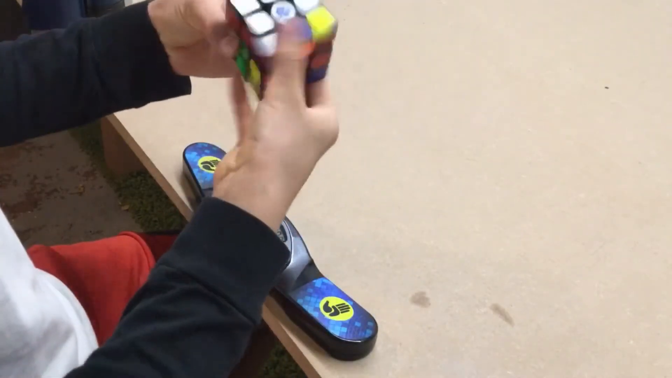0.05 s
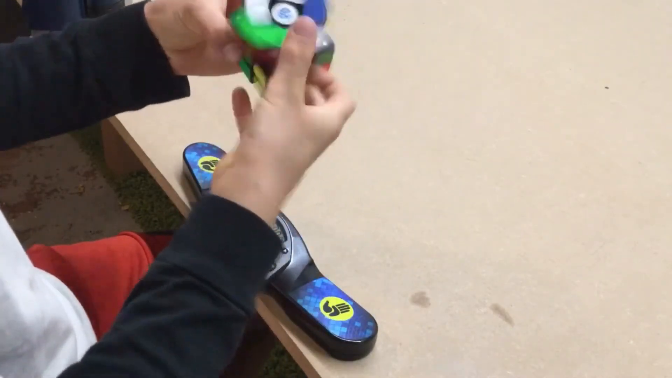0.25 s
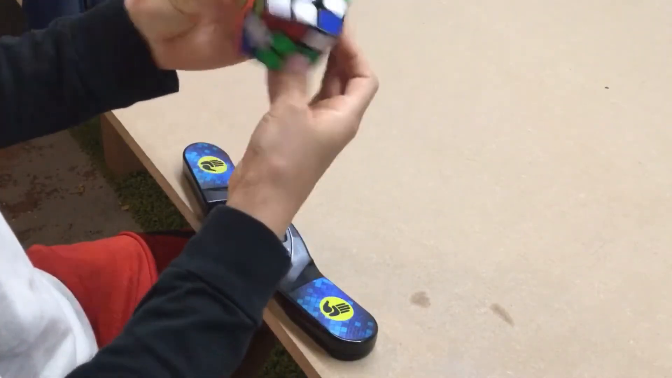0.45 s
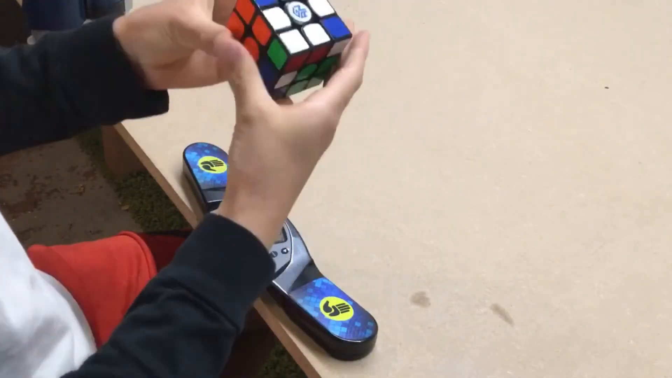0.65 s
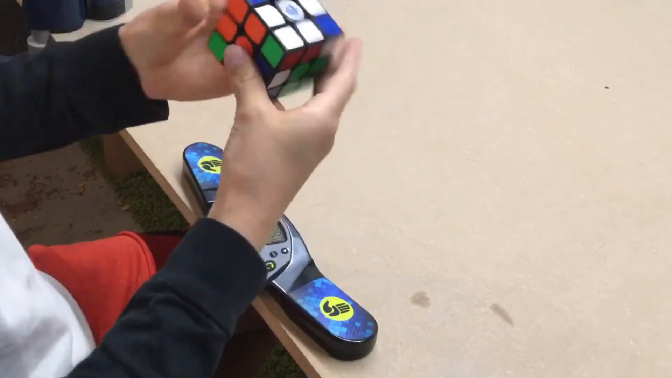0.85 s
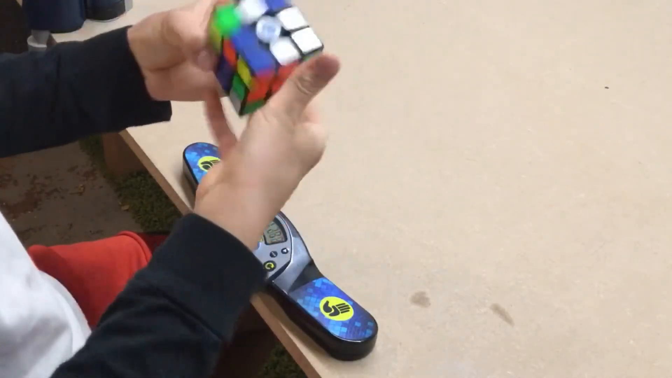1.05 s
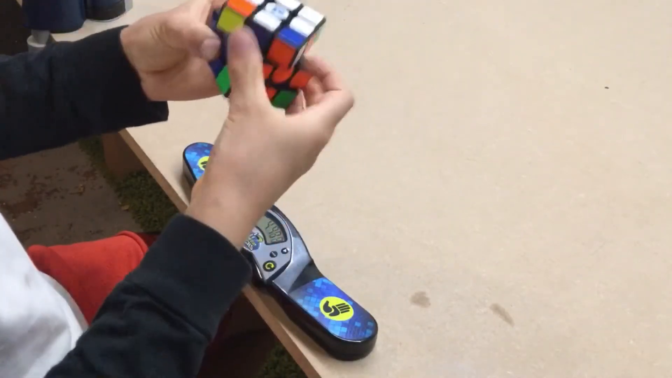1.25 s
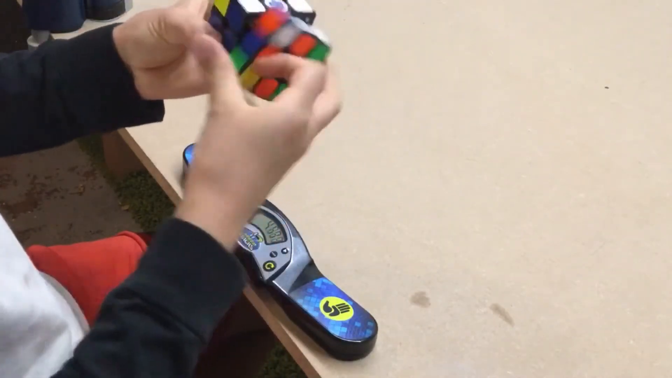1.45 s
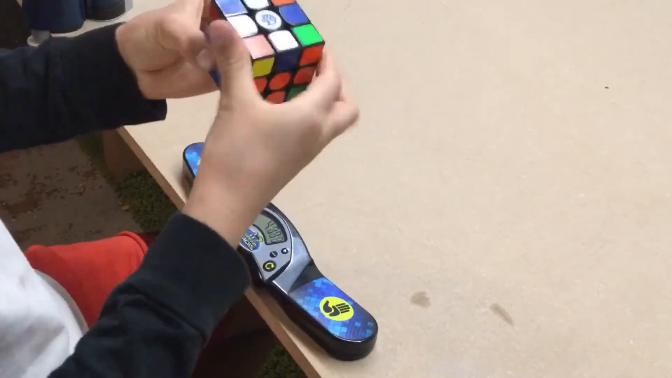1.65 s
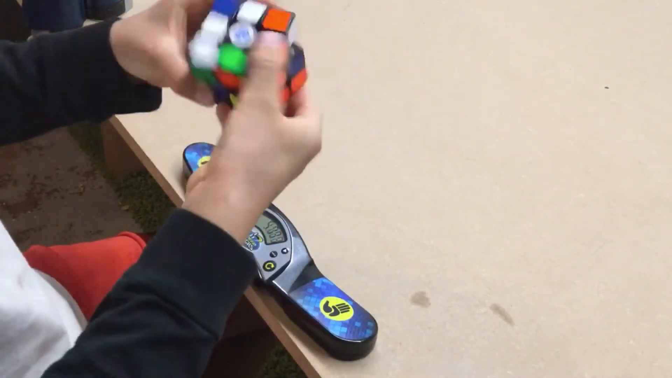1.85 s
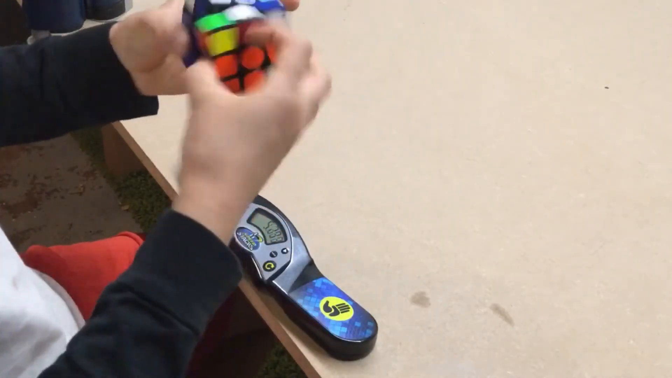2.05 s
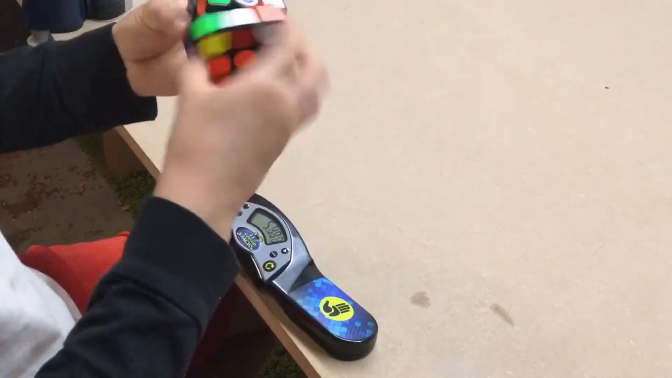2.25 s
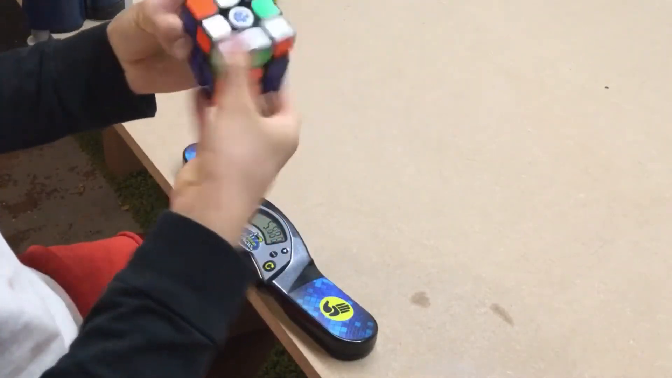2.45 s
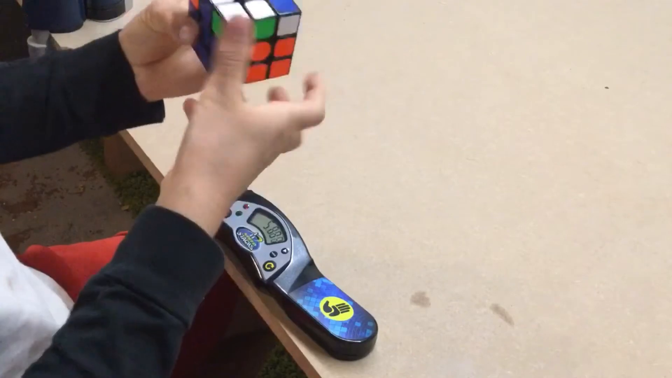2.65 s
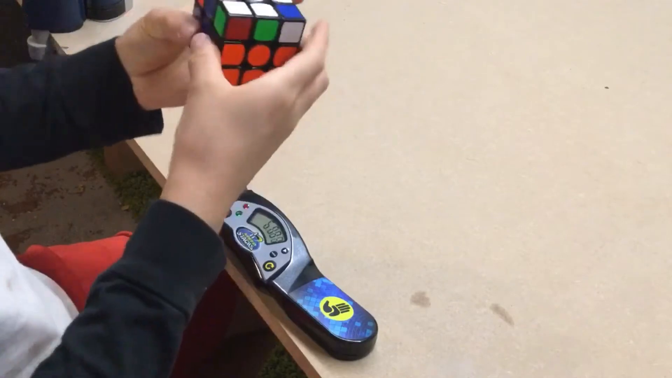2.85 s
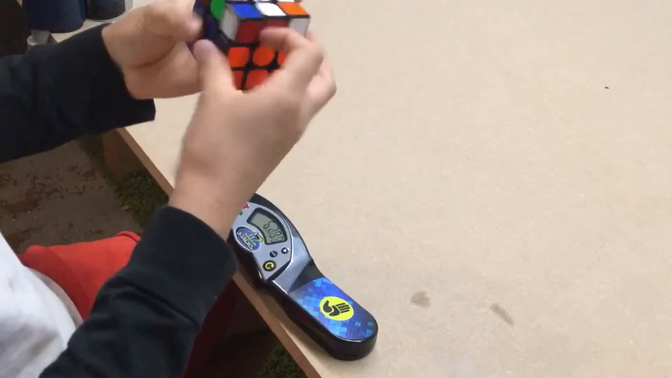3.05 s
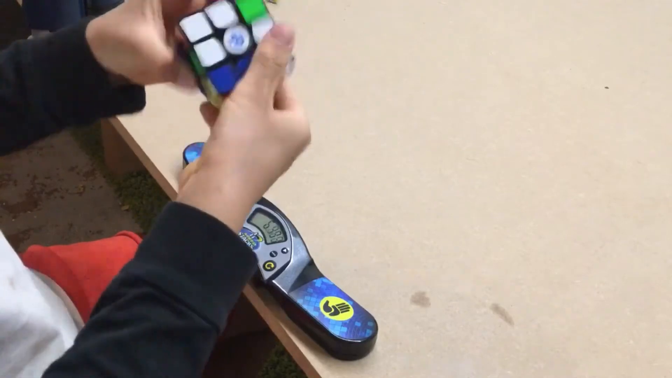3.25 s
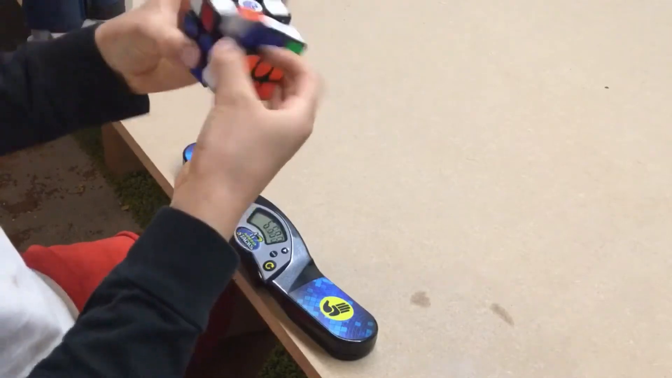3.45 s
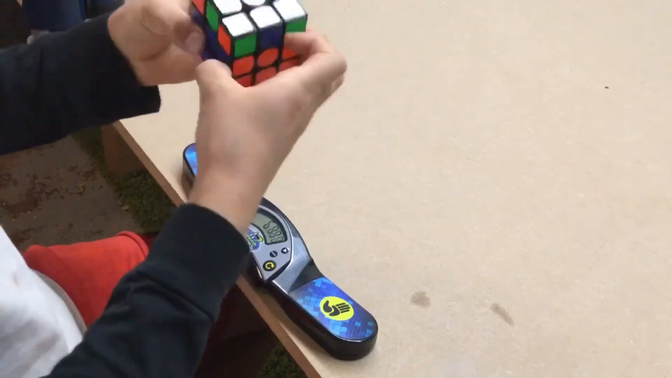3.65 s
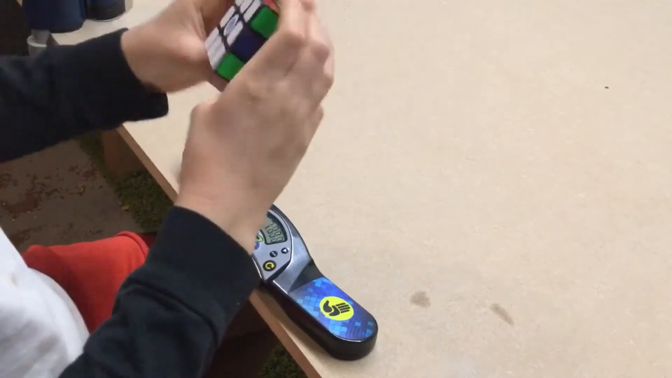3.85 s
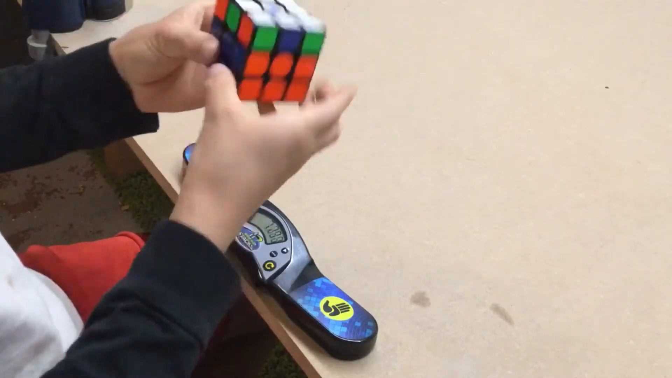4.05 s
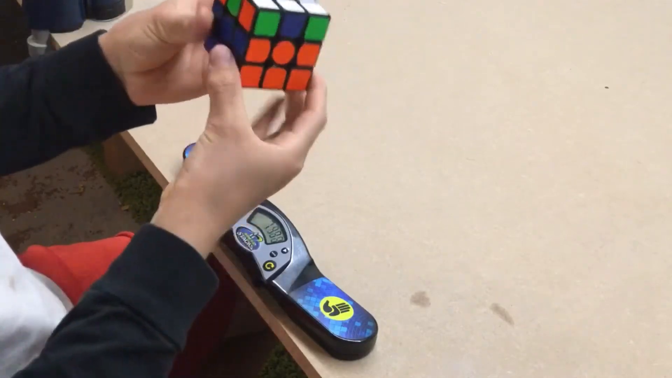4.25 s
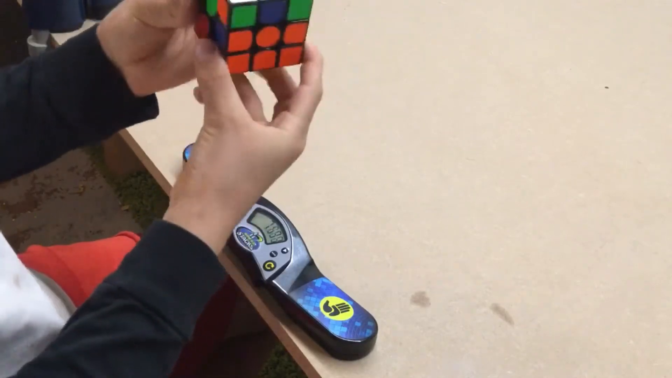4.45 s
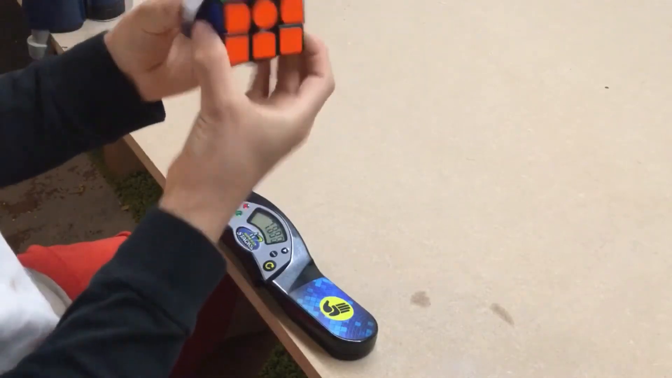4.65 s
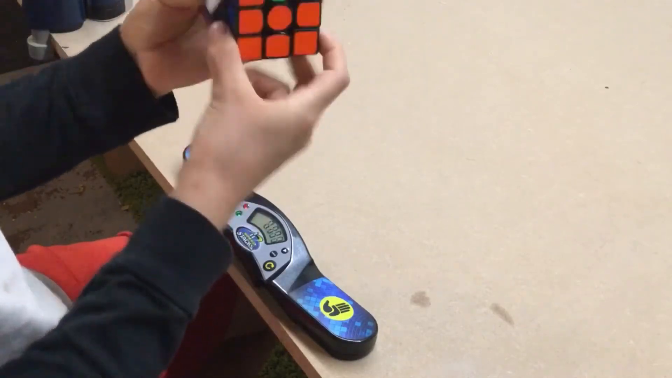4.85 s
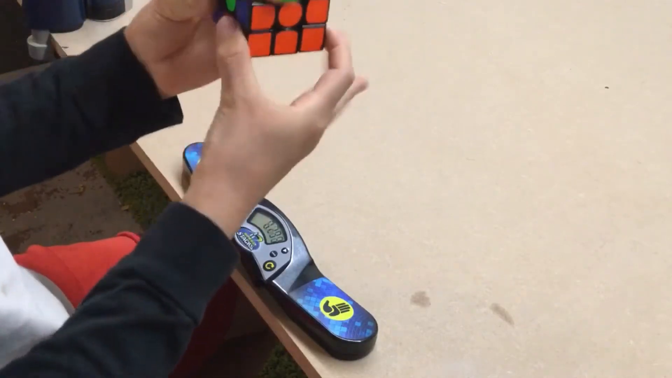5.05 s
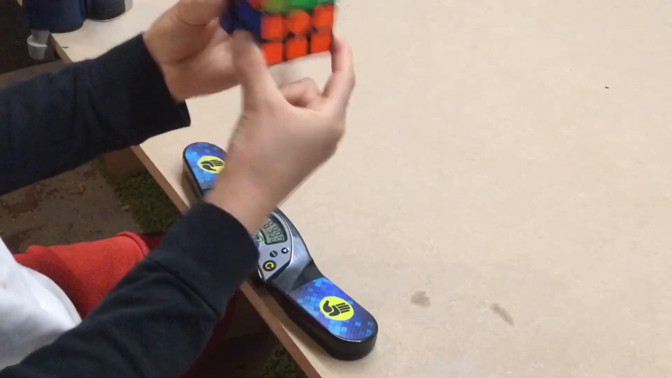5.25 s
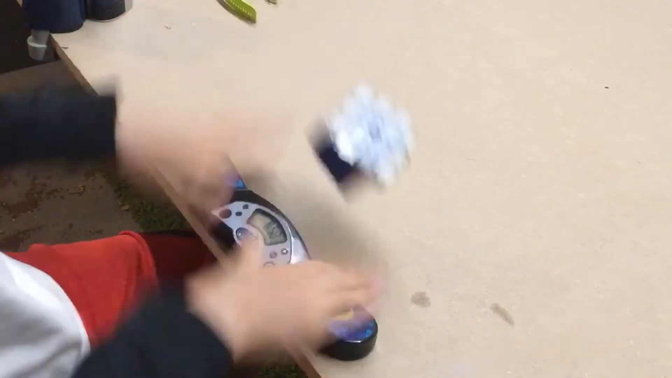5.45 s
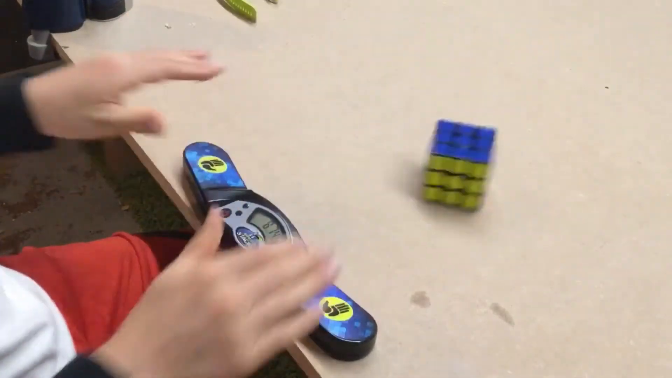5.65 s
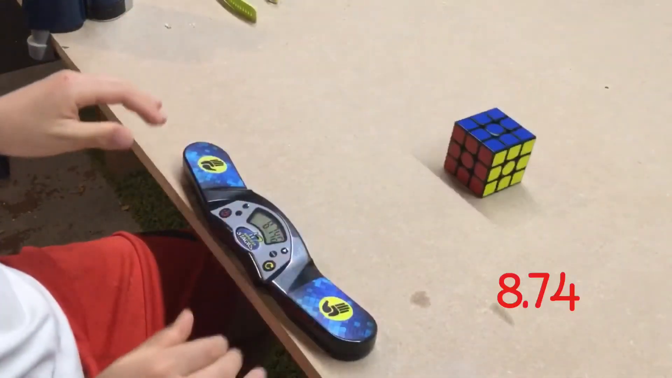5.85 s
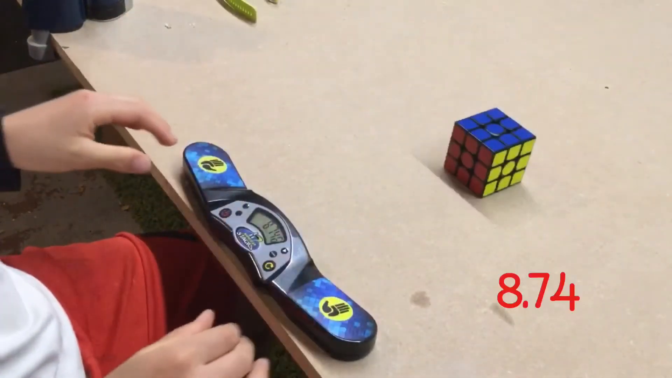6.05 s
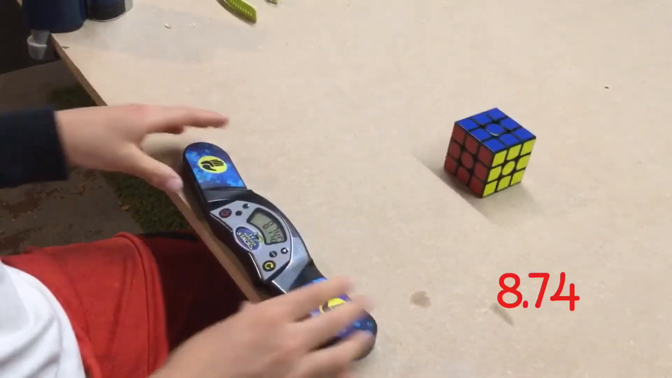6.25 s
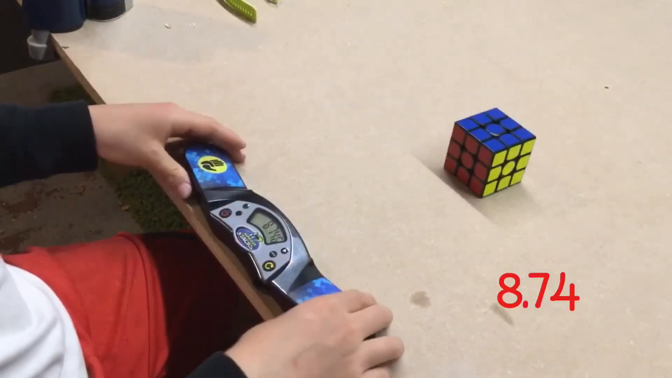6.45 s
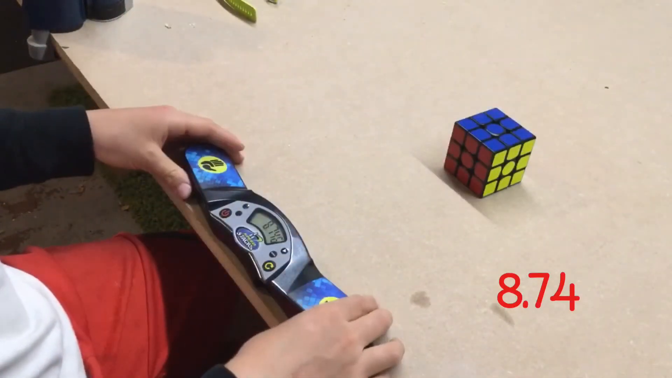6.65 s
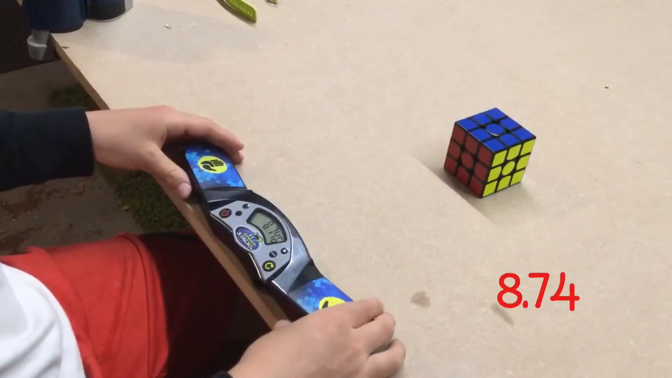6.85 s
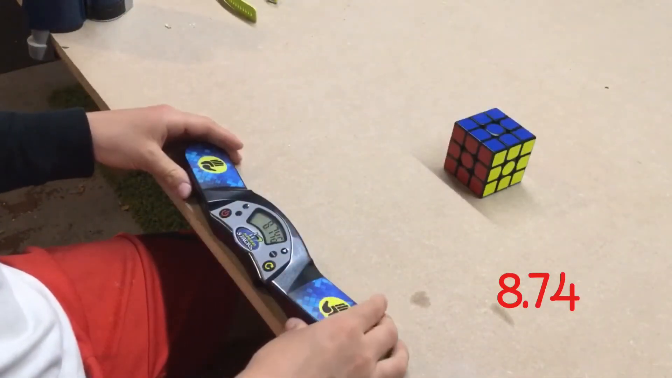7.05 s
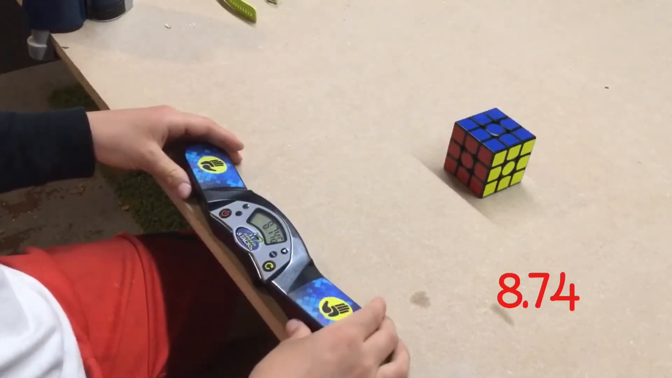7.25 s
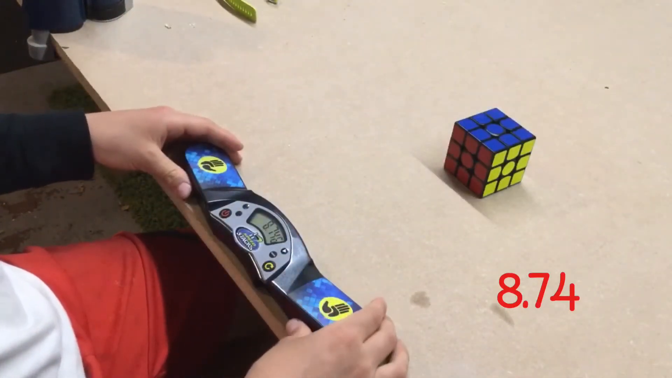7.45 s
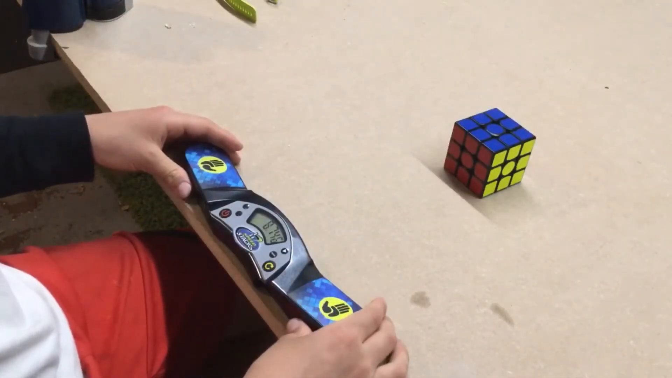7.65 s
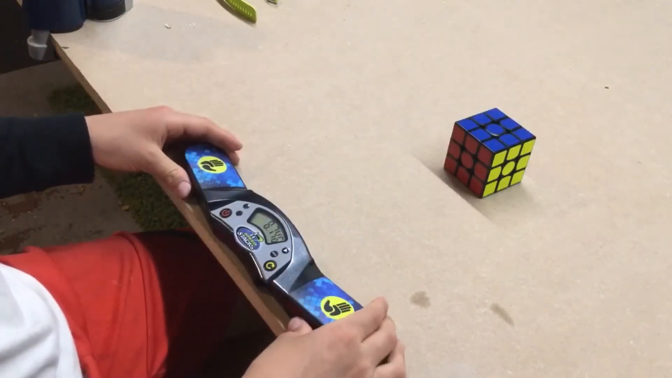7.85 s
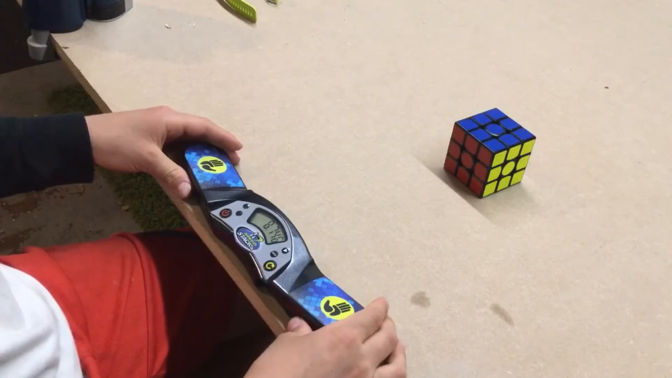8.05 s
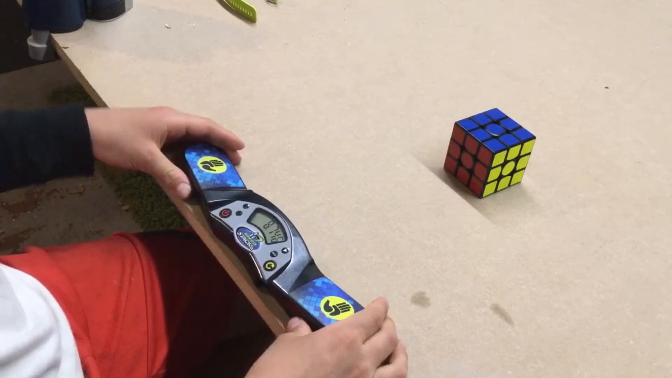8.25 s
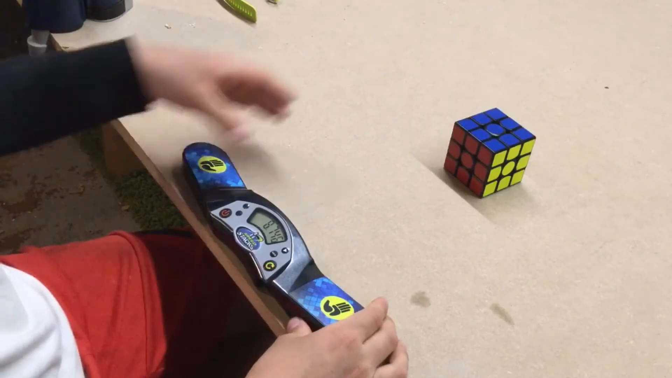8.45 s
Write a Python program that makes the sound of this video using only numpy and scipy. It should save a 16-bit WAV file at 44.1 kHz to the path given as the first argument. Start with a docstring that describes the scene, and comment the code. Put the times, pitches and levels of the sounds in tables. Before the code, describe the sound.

Rapid plastic clacking of a twisted puzzle cube ends in a clattering thump on a table, followed by a light knock over low room hum.

```python
"""In a small room with a low steady hum, hands turn a plastic puzzle cube fast, close to a phone.
Its pieces clack as they snap together and rattle as they slide; a few faint, thin ticks sound nearby.
The cube is dropped on a table, hands slap a timer pad, and the cube tumbles to rest as the top rings.
Later the pad tips and its hollow shell knocks. The room echoes, and the phone mutes faint treble."""
import sys
import numpy as np
from scipy import signal
from scipy.fft import rfft, irfft, next_fast_len
from scipy.io import wavfile
from scipy.ndimage import uniform_filter1d, map_coordinates

SR = 44100
rng = np.random.default_rng(int(sys.argv[2]) if len(sys.argv) > 2 else 0)


def log_audio(samples):
    """Write samples as a 16-bit WAV file to the path given in sys.argv[1]."""
    # one column per channel
    frames = np.atleast_2d(samples).T
    # limit to full scale, then quantise
    limited = np.clip(frames, -1, 1)
    pcm = np.round(limited * 32767).astype(np.int16)
    wavfile.write(sys.argv[1], SR, pcm)


N = 375291

# turns of one layer of the cube: full_speed_at_s, level_db, hold_ms
TURNS = [(0.0, -60, 120), (0.125, -47, 10.7), (0.245, -47.5, 8.9), (0.47, -69, 14), (0.901, -74, 20),
         (1.0, -77, 20), (1.06, -51.5, 21), (1.14, -46, 9.9), (1.315, -53.5, 51), (1.548, -59, 3.6),
         (1.665, -66, 19), (1.745, -57.5, 53), (1.86, -60.5, 41), (1.98, -54.5, 16), (2.1, -61.5, 58),
         (2.179, -57, 44), (2.345, -55, 48), (2.465, -46.5, 34), (2.981, -62, 16), (3.14, -64.5, 60),
         (3.25, -64, 33), (3.345, -44, 41), (3.496, -40.5, 23), (4.24, -70.5, 20), (4.302, -53.5, 43),
         (4.39, -51.5, 11), (4.584, -41.5, 8.4), (4.67, -58, 21), (4.781, -37.5, 29), (4.97, -59.5, 63),
         (5.138, -44.5, 10.6), (5.244, -49, 7.1), (5.335, -62, 110)]


def amp(db):
    """Turn decibels into a number to multiply a sound by."""
    return 10 ** (np.asarray(db) / 20)


def unit(x):
    """Scale a signal so that its average strength (rms) is 1."""
    return x / np.sqrt(np.mean(x ** 2) + 1e-20)


def along(points, hz):
    """Read a curve of (pitch, value) points at hz, with octaves evenly spaced."""
    pitches, values = np.transpose(points)
    return np.interp(np.log(hz + 1), np.log(pitches + 1), values)


def filtered(x, response):
    """Turn each frequency of x up or down by response(hz)."""
    size = next_fast_len(N + SR // 2)
    return irfft(rfft(x, size) * response(np.fft.rfftfreq(size, 1 / SR)), size)[:N]


def motor(shaft_hz=29.07, unsteadiness=.015):
    """A distant machine drones at multiples of its slightly unsteady turning speed."""
    waver = map_coordinates(rng.standard_normal(round(3 * N / SR) + 4), [np.arange(N) * 3 / SR])
    angle = 2 * np.pi * np.cumsum(shaft_hz * (1 + unsteadiness * waver)) / SR
    return sum(np.sin(k * angle + 2 * np.pi * rng.random()) for k in range(2, 17))


def room_hum():
    """Dull, slightly patchy noise with the machine droning inside it."""
    # tone of the hum: pitch_hz, level_db
    hum_tone = [(59, -36), (105, -18.5), (198, -0.5), (264, -9.5), (316, -9), (327, 2.5), (340, -9.5),
                (404, -12.5), (499, -14), (830, -15.5), (858, -10), (886, -15.5), (1530, -20.5),
                (2200, -34.5), (3500, -39), (6000, -58.5), (9000, -120)]
    spectrum = signal.stft(rng.standard_normal(N), nperseg=2048)[2]
    patches = uniform_filter1d(uniform_filter1d(rng.standard_normal(spectrum.shape), 3, 0), 5, 1)
    noise = signal.istft(spectrum * amp(2.1 * unit(patches)), nperseg=2048)[1][:N]
    colour = lambda hz: amp(along(hum_tone, hz))
    return amp(-57.5) * (unit(filtered(noise, colour)) + amp(-7) * unit(filtered(motor(), colour)))


def hollow_ringing(hz):
    """The hollow pieces boost the pitches at which they like to ring."""
    # ringing of the pieces, next to the direct sound: pitch_hz, width_hz, level_db
    rings = [(2012, 550, 0), (6800, 2100, -8)]
    return 1 + sum(amp(db) * 1j * hz * width / (pitch * pitch - hz * hz + 1j * hz * width)
                   for pitch, width, db in rings)


def plastic(envelopes, spiky_db, hollow_hz=2500):
    """Gritty plastic noise: its hollow, middle and sharp parts each follow a loudness curve."""
    # tone of the cube's plastic: pitch_hz, level_db
    plastic_tone = [(240, -51), (400, -18.5), (650, -5.5), (1300, -5), (2900, -2), (6900, 1), (9800, -7),
                    (11600, -4), (15000, -11), (16000, -18.5)]
    signs = np.sign(rng.standard_normal(N))
    grit = unit(signs * amp(spiky_db * unit(uniform_filter1d(rng.standard_normal(N), size=24))))
    hollow = lambda hz: 1 / (1 + (hz / hollow_hz) ** 10)
    sharp = lambda hz: 1 - 1 / (1 + (hz / 9000) ** 12)
    middle = lambda hz: (1 - hollow(hz)) * (1 - sharp(hz))
    out = np.zeros(N)
    for envelope, part in zip(envelopes, (hollow, middle, sharp)):
        colour = lambda hz: part(hz) * amp(along(plastic_tone, hz)) * hollow_ringing(hz)
        average_gain = np.sqrt(np.mean(abs(colour(np.arange(SR // 2))) ** 2))
        out += filtered(envelope * grit, colour) / average_gain
    return out


def bursts(hits, rise, blunt, hollow_stretch, settle_db):
    """Hollow, middle and sharp loudness curves of short hits; rise is a share of a hit's length."""
    envelopes, t = np.zeros((3, N + SR)), np.arange(SR // 20) / SR
    settle = amp(settle_db - 60 * t / 0.051)  # the struck piece keeps shivering faintly
    for s, db, ms, hollow_db, sharp_db in hits:
        age = t / (ms / 1000 * np.array([[hollow_stretch], [1], [.9]]))
        shape = (1 - np.exp(-(age / rise) ** 2)) * (np.exp(-age ** blunt) + settle)
        start = round((s - rise * ms / 2000) * SR)  # the swell begins just before the hit
        envelopes[:, start:][:, :len(t)] += amp([[db + hollow_db], [db], [db + sharp_db]]) * shape
    return envelopes[:, :N]


def sliding_db(s, swell_db_per_s=399, fade_db_per_s=220.5):
    """Level of the sliding at times s: each turn swells, holds and fades; overlapping turns add up."""
    power = 1e-14
    for start, db, hold_ms in TURNS:
        early, late = np.maximum(start - s, 0), np.maximum(s - start - hold_ms / 1000, 0)
        power = power + amp(db - swell_db_per_s * early - fade_db_per_s * late) ** 2
    return 10 * np.log10(power)


def sliding_rattle(touches_per_s=260):
    """Sliding faces hiss under a random patter of tiny, uneven touches."""
    chance = rng.random((N, 2))
    touches = (chance[:, 0] < touches_per_s / SR) * amp(15 * chance[:, 1])
    patter = unit(np.convolve(touches, np.hanning(44), "same") + 1)
    grid_s = np.arange(0, N / SR, .001)
    db = np.interp(np.arange(N) / SR, grid_s, sliding_db(grid_s))
    middle = amp(db) * patter
    hollow = amp(11.5 + 0.19 * db) * middle  # light touches hardly shake the hollow pieces
    sharp = amp(-19.5 - 0.26 * db) * middle  # but they hiss brightly
    return plastic([hollow, middle, sharp], spiky_db=4.0, hollow_hz=4800)


def small_clacks(per_s=24):
    """List minor clacks at random moments, louder where the sliding is louder."""
    draw = rng.random((round(per_s * TURNS[-1][0]), 4))
    spread = 2 * draw - 1
    start_s = (np.arange(len(draw)) + .5 + draw[:, 0]) / per_s
    level_db = sliding_db(start_s) + 8 + 6 * spread[:, 1]
    length_ms = 0.5 * 2 ** spread[:, 2]
    hollow_db = -13.5 + 5 * spread[:, 3]
    return np.transpose([start_s, level_db, length_ms, hollow_db])


def piece_notes(hits, low_hz=700, high_hz=3600):
    """Each clack rings a different piece, leaving a short note at a random pitch."""
    out, t = np.zeros(N + SR), np.arange(SR // 25) / SR
    for (s, db, ms, hollow_db, _), (pitch, life) in zip(hits, rng.random((len(hits), 2))):
        hz = low_hz * (high_hz / low_hz) ** pitch
        ring_s = 0.0068 * (.5 + life)
        note = amp(db + hollow_db - 11 - 60 * t / ring_s) * np.sin(2 * np.pi * hz * t)
        out[round(s * SR):][:len(t)] += note * (1 - np.exp(-t / (ms / 2000)))
    return out[:N]


def cube_clacks(sharp_db=-7):
    """Pieces snap together, each with a burst of plastic noise and a short note."""
    # the louder clacks: start_s, relative_level_db, length_ms, hollow_part_db
    loud_clacks = [(0.0043, -25, 0.71, -15), (0.0162, -20.5, 1.8, -4), (0.0252, -22, 0.93, -14),
                   (0.036, -36, 1.6, 0.5), (0.0715, -29.5, 2.7, -5.5), (0.0926, -18.5, 0.78, -25.5),
                   (0.1159, -30, 2.4, -16), (0.1459, -27.5, 2.4, -18), (0.1933, -32, 0.7, -4),
                   (0.2296, -24, 4, -9), (0.243, -15, 1.3, -7.5), (0.2706, -39.5, 0.78, 10.5),
                   (0.3009, -32.5, 2.1, -1.5), (0.339, -41.5, 1.2, 3.5), (0.9141, -28, 0.26, -7),
                   (1.0105, -39, 0.85, -15.5), (1.0567, -19.5, 1.76, -9.5), (1.0697, -28.5, 0.78, -6),
                   (1.0948, -31, 2.8, -2), (1.1162, -17, 1.8, -11.5), (1.146, -17, 0.13, -5.5),
                   (1.1525, -26, 2.8, -6), (1.1668, -29, 1.7, 1), (1.2328, -32.5, 1.1, -7),
                   (1.2853, -36.5, 0.7, 1), (1.2945, -30, 2, -8), (1.3226, -20, 1, -14),
                   (1.378, -28, 1.1, -11), (1.4353, -33, 2.2, -1), (1.4736, -28.5, 0.52, -28),
                   (1.545, -29.5, 1.9, -7.5), (1.558, -35.5, 1.7, -3), (1.578, -40, 1, -8),
                   (1.678, -43.5, 4.1, 4), (1.7312, -31.5, 4.1, -6.5), (1.7512, -21, 2.7, -7),
                   (1.807, -36, 0.5, -15), (1.8441, -28, 2.1, -15), (1.872, -38, 2.9, 2),
                   (1.891, -31.5, 2.5, -8.5), (1.9098, -42, 1.4, -5), (1.92, -33.5, 1.8, -12),
                   (1.932, -41, 0.5, -11), (1.9555, -34, 0.7, -3), (1.9736, -32, 2.4, -20),
                   (1.982, -28.5, 2.7, -6), (2.0026, -38, 0.76, 0), (2.0298, -31.5, 0.83, -15),
                   (2.046, -34.5, 1.8, -4), (2.074, -35, 1.1, -6), (2.097, -24.5, 0.75, -19),
                   (2.1157, -43, 2.1, 3), (2.127, -32, 3.2, -4), (2.1405, -37, 4.3, -4.5),
                   (2.1751, -22, 0.69, -10), (2.2035, -28, 2, -9), (2.2272, -32, 1, -4),
                   (2.245, -29, 0.65, -10), (2.3075, -36, 0.51, -15), (2.3363, -16.5, 0.53, -15),
                   (2.3449, -24, 4.6, -8), (2.357, -26, 0.97, -6), (2.3711, -34, 2.3, -1),
                   (2.4576, -15.5, 1.7, -18), (2.4723, -11.5, 0.87, -10), (2.4777, -18.5, 1.7, -14),
                   (2.4858, -27, 4.9, -10), (2.5146, -17.5, 1.7, -12), (2.5253, -20.5, 0.82, -2.5),
                   (2.5667, -33.5, 1.3, -14), (2.98, -33, 3.3, -5), (2.9921, -36, 0.54, -1),
                   (3.0502, -33.5, 0.45, -30), (3.0605, -30.5, 0.38, -27.5), (3.1328, -33.5, 2.6, -4.5),
                   (3.1896, -36, 0.66, 7.5), (3.2445, -27, 2.4, -8), (3.2592, -35, 0.7, -1),
                   (3.3025, -30.5, 0.84, -4), (3.3225, -21.5, 0.81, -12), (3.3324, -29, 3.1, -19),
                   (3.345, -25, 2, -6), (3.3565, -17.5, 1.5, -2), (3.3775, -21, 1.2, -22),
                   (3.4015, -24, 3.3, -7.5), (3.4412, -34, 2.1, -3), (3.4622, -8, 0.47, -11.5),
                   (3.4922, -14.5, 0.87, -19), (3.4979, -9, 1.2, -12), (3.5025, -13.5, 1.5, -8.5),
                   (3.5104, -13.5, 3.5, -13), (3.5254, -15, 1.8, -15), (3.5441, -19, 1.2, -7),
                   (3.5907, -32, 1, -10), (3.71, -57, 5.6, -29), (4.139, -55, 1.06, -2),
                   (4.2405, -43.5, 0.64, -10), (4.2555, -54, 0.8, -12), (4.2684, -34, 0.63, -6.5),
                   (4.29, -21, 2.3, -5), (4.2996, -17.5, 0.78, -11), (4.306, -13.5, 1.8, -16),
                   (4.311, -22, 2.3, -19.5), (4.3147, -24, 0.67, 0), (4.3952, -32, 1.8, 1),
                   (4.4057, -19.5, 0.23, -2.5), (4.4303, -31.5, 2.3, -7), (4.497, -39, 0.7, -11),
                   (4.5675, -14, 0.46, -32), (4.581, -20, 0.87, -3), (4.588, -7.5, 0.51, -15),
                   (4.5989, -10, 0.9, -15), (4.6024, -15.5, 3.9, -10), (4.6478, -28.5, 5.7, -3),
                   (4.6596, -23.5, 4.3, -13), (4.688, -34, 4, -1), (4.7043, -26.5, 1.3, -5.5),
                   (4.7409, -22, 1, -7), (4.754, -25, 1.1, -14), (4.7645, -17.5, 3.9, -10),
                   (4.7756, -12, 1.3, -15), (4.7797, -19, 5.7, -14), (4.7925, -7.5, 1.3, -17),
                   (4.8011, -16, 1.5, -20), (4.8137, -12.5, 1.7, -17), (4.8564, -33, 5.6, -8),
                   (4.864, -30, 3.1, -13), (4.877, -15.5, 0.47, -7), (4.9623, -30.5, 1.8, -18),
                   (4.983, -34.5, 0.81, -3), (5.003, -27, 0.29, -2.5), (5.0263, -31, 0.27, 2),
                   (5.0507, -28, 1.8, -14), (5.0705, -44, 0.6, -11), (5.119, -18.5, 0.36, -10),
                   (5.1332, -16.5, 3.4, -5.5), (5.1449, -8, 0.38, -19), (5.1535, -23.5, 0.68, -2),
                   (5.1831, -34, 1.2, 5), (5.2295, -22, 2.6, -13), (5.238, -18, 0.82, -8.5),
                   (5.2575, -13.5, 0.42, -17), (5.2671, -21, 2.8, -7)]
    hits = [(*clack, sharp_db) for clack in [*loud_clacks, *small_clacks()]]
    envelopes = amp(2.0) * bursts(hits, rise=0.95, blunt=1.11, hollow_stretch=1.2, settle_db=-24)
    return plastic(envelopes, spiky_db=3.5) + piece_notes(hits)


def cube_squeaks():
    """A piece sings on one slightly rough note while a layer slides."""
    # squeaks: start_s, pitch_hz, level_db, length_ms
    squeaks = [(1.874, 2150, -45, 34), (4.625, 1900, -42.5, 72)]
    out = np.zeros(N)
    for s, hz, db, ms in squeaks:
        swell = np.hanning(round(ms / 1000 * SR))
        t = np.arange(len(swell)) / SR
        wander = np.cumsum(rng.standard_normal(len(t))) * .1
        out[round(s * SR):][:len(t)] += amp(db) * swell * np.sin(2 * np.pi * hz * t + wander)
    return out


def faint_ticks(pitch_hz=8360):
    """Each tick is a thin, unsteady high ring with a puff of hiss."""
    # ticks somewhere in the room: start_s, ring_db, puff_db
    ticks = [(3.932, -54.5, -77.5), (3.998, -68, -61.5), (4.1037, -90, -55.5), (4.113, -57, -78.5),
             (4.206, -69, -62), (7.988, -58, -66.5), (8.106, -67, -60.5)]
    # tone of the puff: pitch_hz, level_db
    puff_tone = [(3400, 4.5), (5200, -8), (8500, 7), (10500, 0.5), (14500, 0)]
    ring, puff, t = np.zeros(N + SR), np.zeros(N + SR), np.arange(SR // 4) / SR
    onset = 1 - np.exp(-t / 0.002)
    ring_fade = amp(-60 * t / 0.041) + amp(-9.5 - 60 * t / 0.2)
    puff_fade = amp(-60 * t / 0.019) + amp(-5.5 - 60 * t / 0.14)
    for s, ring_db, puff_db in ticks:
        ring[round(s * SR):][:len(t)] += amp(ring_db) * onset * ring_fade
        puff[round(s * SR):][:len(t)] += amp(puff_db) * onset * puff_fade
    narrow = unit(filtered(rng.standard_normal(N), lambda hz: np.exp(-((hz - pitch_hz) / 350) ** 2)))
    broad = unit(filtered(rng.standard_normal(N), lambda hz: amp(along(puff_tone, hz)) * (hz > 2500)))
    return ring[:N] * narrow + puff[:N] * broad


def table_hits():
    """Each hit clatters the plastic and rings the table top's notes in a new mix."""
    # hands, pad and cube landing: start_s, level_db, length_ms, hollow_part_db, sharp_part_db, thump_db
    hits = [(5.429, -15, 8.4, 0.5, -4, -27), (5.449, -23.5, 6.9, 0, -3, -24),
            (5.455, -37, 4.3, 2, -13, -22.5), (5.468, -14.5, 10.4, -2, -2.5, -23),
            (5.48, -24, 6.2, 3.5, -14, -28.5), (5.518, -24.5, 3.1, 3.5, -26, -28.5),
            (5.5832, -31, 5.3, 3.5, -3.5, -49.5), (5.6105, -38.5, 6, 8.5, -5, -56.5),
            (5.654, -46.5, 6.3, 7.5, -6, -50), (5.6977, -45, 3.1, 9, -8.5, -52.5)]
    # notes of the table top: pitch_hz, level_db, ring_s (time to fade by 60 dB)
    table_notes = [(134, -3, 0.13), (170, -6, 0.085), (242, 2, 0.055), (294, 1, 0.12), (352, -1, 0.12),
                   (375.6, -3.5, 0.1), (440, -3.5, 0.07), (506, -4, 0.07), (587, -3.5, 0.054),
                   (1140, -11, 0.092)]
    envelopes = bursts(np.array(hits)[:, :5], rise=0.34, blunt=5.4, hollow_stretch=1.0, settle_db=-20.5)
    clatter = plastic(envelopes, spiky_db=5.0, hollow_hz=3973)
    thumps, t = np.zeros(N + SR), np.arange(SR // 2) / SR
    onset = 1 - np.exp(-t / 0.003643)
    # neighbouring notes swing in opposite directions
    notes = np.array([(-1) ** k * amp(db - 60 * t / ring_s) * np.sin(2 * np.pi * hz * t) * onset
                      for k, (hz, db, ring_s) in enumerate(table_notes)])
    for s, *_, thump_db in hits:
        thumps[round(s * SR):][:len(t)] += amp(thump_db + 2.7 * rng.standard_normal(len(notes))) @ notes
    return clatter, thumps[:N]


def pad_knocks():
    """The timer pad tips onto the table: its hollow shell clacks over a dull scuff."""
    # a knock and a faint second touch: start_s, shell_db, scuff_db, scuff_length_ms
    knocks = [(7.2221, -28, -42, 30), (7.298, -45, -60, 12)]
    # notes of the shell: pitch_hz, level_db, ring_s
    shell_notes = [(280, -1, .05), (430, -4, .05), (615, -5, .04), (1150, -1, .022), (1500, -1, .028),
                   (2200, -1, .016), (3250, 1, .012), (4000, -2, .009)]
    shell, scuff_level, t = np.zeros(N + SR), np.zeros(N + SR), np.arange(SR // 5) / SR
    onset = 1 - np.exp(-(t / 0.0022) ** 2)
    for s, shell_db, scuff_db, ms in knocks:
        for hz, db, ring_s in shell_notes:
            fade = amp(shell_db + db + 2 * rng.standard_normal() - 60 * t / ring_s)
            build = 1 - np.exp(-(t * hz / 2.9) ** 2)  # low notes take longer to build
            note = np.sin(2 * np.pi * (hz * t + rng.random()))
            shell[round(s * SR):][:len(t)] += onset * build * fade * note
        scuff_level[round(s * SR):][:len(t)] += amp(scuff_db) * onset * np.exp(-t / (ms / 1000))
    dull = lambda hz: hz / (hz + 150) * (0.089 + 1 / (1 + (hz / 2600) ** 4))
    return shell[:N] + scuff_level[:N] * unit(filtered(rng.standard_normal(N), dull))


def room_echo(x, change_every_s=.35, delay_samples=200):
    """High pitches die away first; moving hands keep changing the pattern of echoes."""
    # how long the room rings: pitch_hz, ring_s
    ring_times = [(150, 0.65), (1000, 0.55), (3000, 0.3), (8000, 0.28), (15000, 0.092)]
    out, step = np.zeros(N + SR), round(change_every_s * SR)
    for start in range(0, N, step):
        hz, t, spectrum = signal.stft(rng.standard_normal(SR // 2), SR, nperseg=256)
        fade = amp(-60 * t / along(ring_times, hz)[:, None])
        tail = signal.istft(spectrum * fade, SR, nperseg=256)[1]
        echo = signal.fftconvolve(x[start:start + step], tail / np.linalg.norm(tail))
        arrival = start + delay_samples
        out[arrival:][:len(echo)] += echo[:len(out) - arrival]
    return out[:N]


def scene():
    """The cube in the hands, then on the table, then the pad, all in the humming room."""
    cube = sliding_rattle() + cube_clacks() + cube_squeaks()
    clatter, thumps = table_hits()
    pad = pad_knocks()
    echo = room_echo(amp(-14.0) * cube + amp(-7.5) * clatter + amp(-7.0) * thumps + amp(-10.0) * pad)
    return (cube + clatter + thumps + pad + echo + faint_ticks() + room_hum())[None]


def record(dry, gate_db=-84, low_hz=94, top_hz=15900):
    """The phone mutes faint treble, adds hiss, rounds off peaks and cuts the lowest and highest sound."""
    hz, _, spectrum = signal.stft(dry[0], SR, nperseg=512)
    power = uniform_filter1d(uniform_filter1d(abs(spectrum) ** 2, size=3, axis=0), size=5, axis=1)
    power = np.maximum(power, signal.lfilter([.5], [1, -.5], power))  # lets go slowly after a sound
    leniency = 1 + (2900 / (hz[:, None] + 1)) ** 8 + np.minimum(hz[:, None] / 3600, 2) ** 4
    threshold = amp(gate_db) ** 2 / leniency  # highest in the low treble
    gain = np.minimum(1, abs(power) / threshold) ** 1.7
    hiss = amp(-96) * unit(filtered(rng.standard_normal(N), lambda f: (f + 2000) ** -.6))
    gated = signal.istft(spectrum * gain, SR, nperseg=512)[1][:N] + hiss
    rounded = gated / (1 + abs(gated / .62) ** 4) ** .25
    band = lambda f: f ** 6 / (f ** 6 + low_hz ** 6) / (1 + np.exp((f - top_hz) / 25))
    return filtered(rounded, band)[None]


dry = scene()
out = record(dry)
log_audio(out)
```